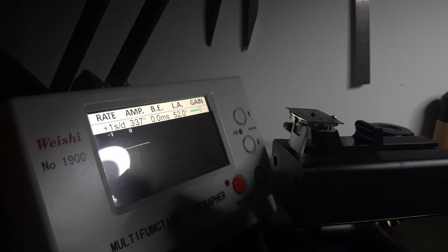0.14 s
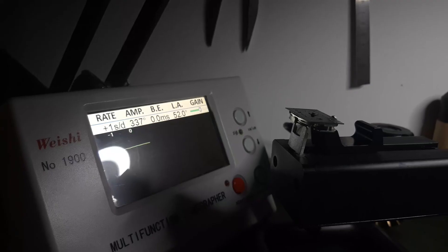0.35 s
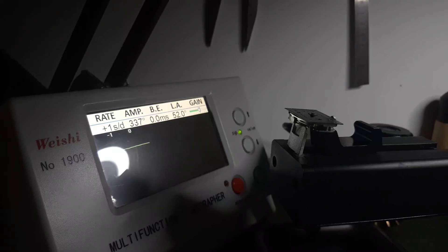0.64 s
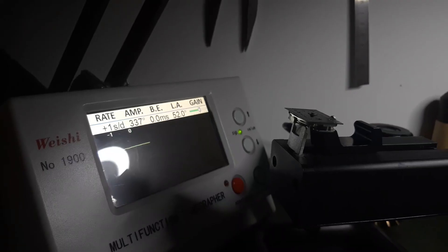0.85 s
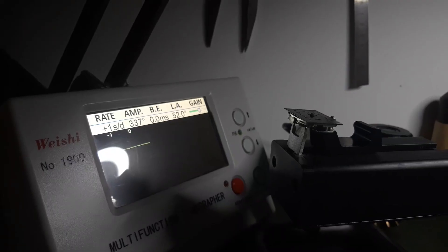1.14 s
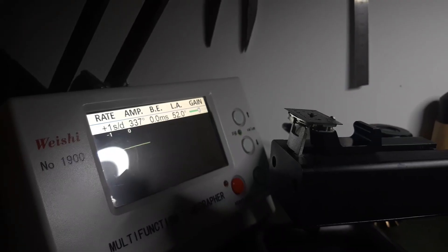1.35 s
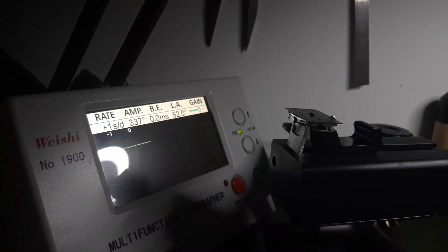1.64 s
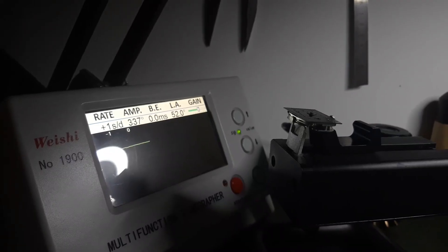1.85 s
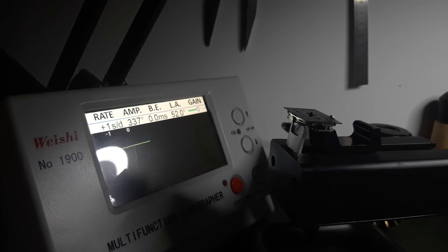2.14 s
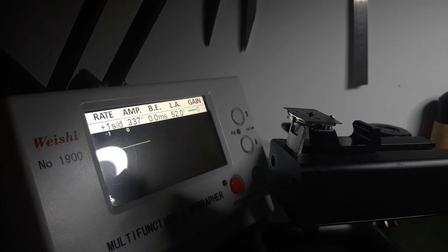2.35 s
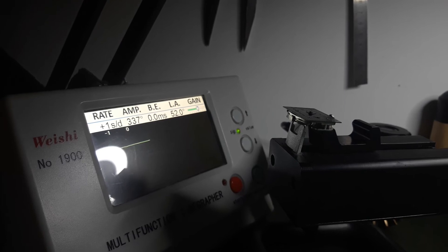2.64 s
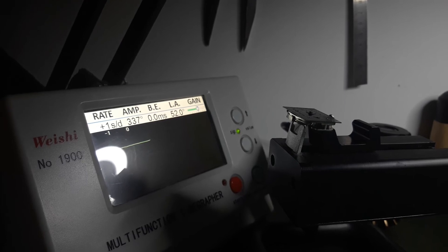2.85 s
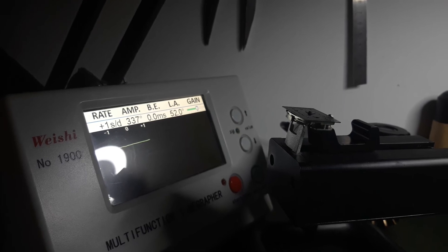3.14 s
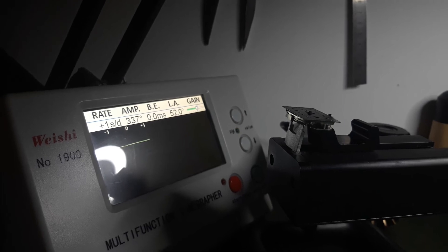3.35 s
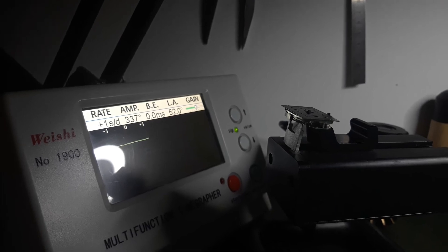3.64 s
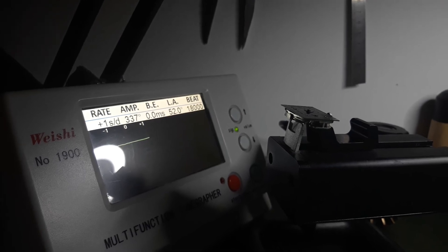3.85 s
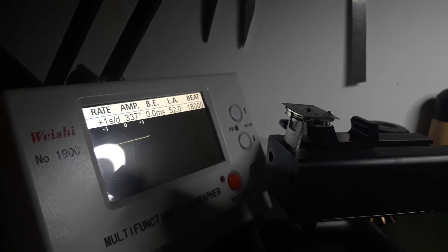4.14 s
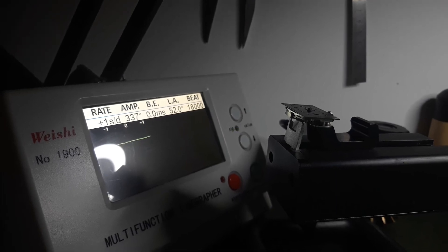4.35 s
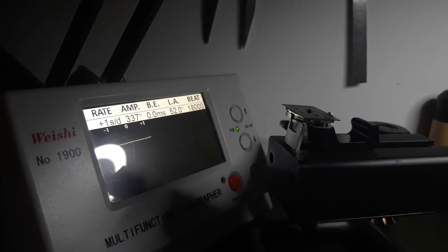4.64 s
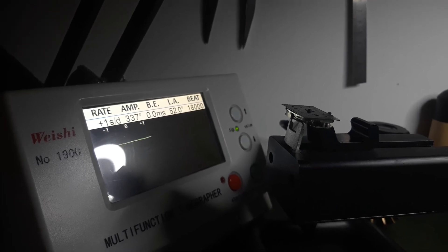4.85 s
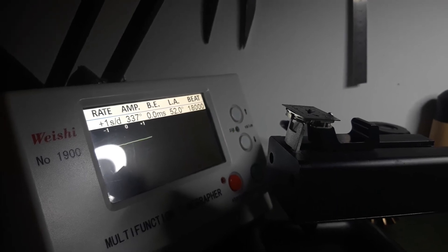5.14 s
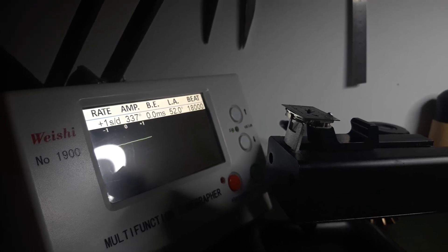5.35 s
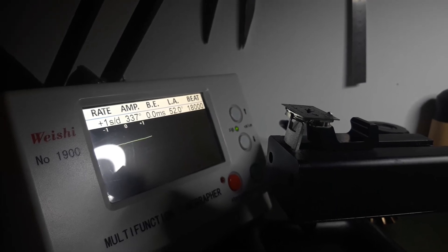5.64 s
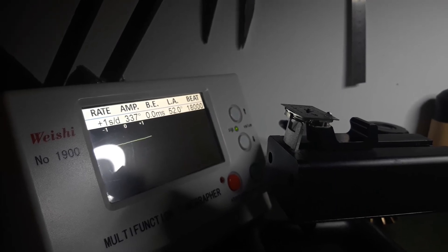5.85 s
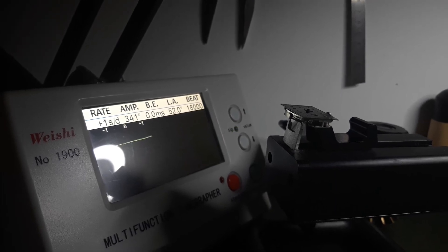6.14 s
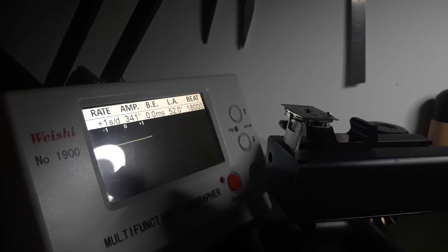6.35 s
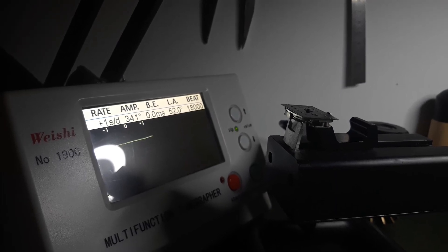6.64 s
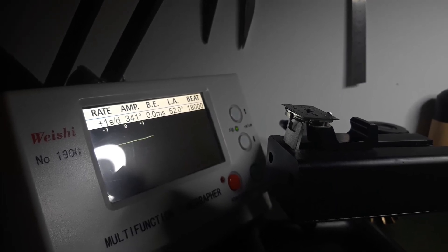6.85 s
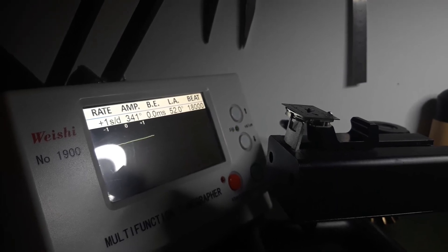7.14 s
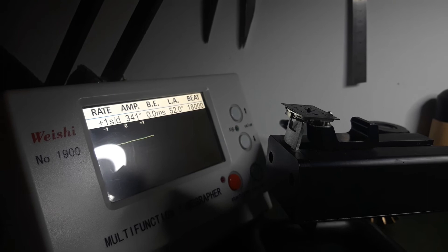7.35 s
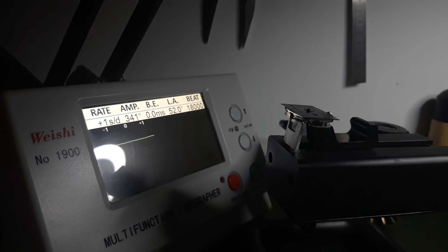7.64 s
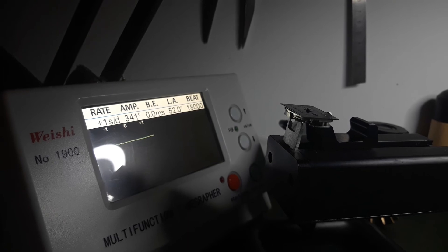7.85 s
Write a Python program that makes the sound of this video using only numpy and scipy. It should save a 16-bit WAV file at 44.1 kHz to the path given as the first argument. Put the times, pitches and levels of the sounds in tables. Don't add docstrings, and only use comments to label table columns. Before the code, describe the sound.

Steady bright electronic-sounding clicks, five per second, each just after a tiny watch tick, over faint distant mechanical rubbing, low rumble and soft hiss.

```python
import sys
import numpy as np
from scipy import signal
from scipy.fft import irfft
from scipy.io import wavfile
from scipy.ndimage import uniform_filter1d

SR = 44100
rng = np.random.default_rng(int(sys.argv[2]) if len(sys.argv) > 2 else 0)


def level_to_linear(level):
    exponent = np.asarray(level, float) / 20
    return 10 ** exponent


def master_out(mix):
    frames = np.transpose(np.atleast_2d(mix))
    ceiling = np.clip(frames, -1, 1)
    pcm = np.round(ceiling * 32767).astype(np.int16)
    wavfile.write(sys.argv[1], SR, pcm)


N = 352800

# f/Hz, level/dB, start/ms, push/ms, rise and fall/ms
DISC_MODES = [(2849, -20.5, 0.53, 8.43, 1.16), (4496, -25.5, 0.991, 5.1, 1.5),
              (2314.6, -27.5, 0.15, 8.27, 3.8), (2046.2, -25.5, 0.89, 3.87, 3.83),
              (2504.5, -30.5, 0.085, 8.9, 5.1), (3010, -27, 0.846, 5.54, 11), (5142, -43, 2.38, 5.7, 0.49),
              (4798, -39, 0.61, 4.5, 0.99), (3563, -39.5, .7, 5.5, 0.96), (3835, -41.5, 5.7, 5, 0.13),
              (3950, -34, .73, 1.9, 1.4), (2648, -33.5, 1.82, 3.8, 4.4)]
# f/Hz, level/dB, start/ms, push/ms, rise and fall/ms
CASE_MODES = [(570, -75.5, 2, 5.3, 0.85), (1390, -57, 1.6, 4.1, 1.9), (1209, -70, 2.455, 4, 1.1),
              (6014, -75, 0.26, 14, 1.6), (7430, -65, 0.74, 1.7, 0.62), (7750, -66.5, 5.5, 2.5, 0.96)]
# delay/ms, level/dB, smear/ms
WALL_ECHOES = [(6.5, -23, 0.77), (19.9, -13, 0.52), (28.3, -29.5, 4.3), (54.7, -31, 3.9), (76, -44.5, 17)]
# f/Hz, level 30 ms after the click/(dB per Hz), t60/s
ROOM_TAIL = [(1070, -116, 0.15), (1410, -99, 0.31), (1660, -113, 0.16), (1970, -82.5, 0.24),
             (2130, -85.5, 0.41), (2877, -75, 0.36), (3187, -84.5, .3), (3510, -94, 0.32), (3850, -85, 0.3),
             (4070, -89.5, 0.28), (4530, -78.5, 0.34), (4890, -88, 0.19), (5750, -105, 0.37),
             (8300, -123, 0.29)]
# f/Hz, level/(dB per Hz)
FLOOR_SPECTRUM = [(25, -116), (50, -107), (80, -99.5), (120, -98), (180, -103), (250, -110), (400, -113),
                  (800, -115.5), (1200, -118), (5800, -118), (7000, -120.5), (8500, -122.5), (11300, -123),
                  (15500, -121)]
# t into the cycle/s, level/dB, length/s
STROKES = [
    (0, -57, .045),
    (0.161, -62.5, .03),
    (0.479, -57.5, .037),
]
# f/Hz, width/Hz, level/dB
STROKE_RINGS = [
    [(2740, 270, 0), (3060, 340, 0.5), (3900, 500, -12.5), (4550, 450, -13), (4970, 380, -7.5)],
    [(2630, 400, -2), (2880, 260, 0), (4160, 260, -5.5), (5020, 400, -12.5), (6240, 1700, -10.5)],
    [(2540, 330, -1), (3180, 190, 1.5), (3740, 270, -9), (4300, 220, -6), (5900, 900, -18)],
]
CATCH_LATE = [0, -.035, 0.014, -0.0041, -.005, -.005, -0.045, .03]
HARD_TICKS = {14: 3, 18: 6, 24: 7, 38: 4}
# t/s, peak level/dB, low edge f/Hz, high edge f/Hz, decay/ms
KNOCKS = [
    (.79, -68, 70, 189, 7.2),
    (3.528, -66, 100, 450, 4),
    (4.047, -66, 500, 1350, 1.8),
    (4.047, -59, 55, 450, 2.4),
    (6.659, -65, 35, 110, 10),
    (7.441, -70, 100, 200, 25),
    (7.743, -57, 4000, 7800, 0.25),
]

FIRST_CLICK_S, BEAT_S, BEATS = .10062, .199992, 40
DISC_LO_HZ, DISC_HI_HZ = 1936, 5480
RATTLE_DB = -60
TOCK_DB = -0.1
FADE_DB_PER_S = -0.03
GATE_SHUT_DB, GATE_OPEN_DB, GATE_MEMORY_S = -71, -60.5, 0.06
CLICK_SHUT_DB, CLICK_OPEN_DB = 0.99, 2.5
TICK_LEAD_S = .019
TICK_DB, TICK_TOCK_DB, TICK_SCATTER_DB = -64.5, -4, 2
FIRST_STROKE_S, CYCLE_S = .555, 1.1495
STROKE_TAIL_S, STROKE_SCATTER_DB = 0.051, 2.6
THUD_SHARE = 0.54


def level(x, db):
    return x * level_to_linear(db) / np.sqrt(np.mean(x ** 2))


def band(x, lo_hz, hi_hz, order=2):
    return signal.sosfilt(signal.butter(order, [lo_hz, hi_hz], "band", fs=SR, output="sos"), x)


def add(track, s, sound):
    i = int(round(s * SR))
    part = sound[max(-i, 0):N - i]
    track[max(i, 0):max(i, 0) + len(part)] += part


def white(count):
    hz = np.arange(count // 2 + 1) * SR / count + 1
    turns = rng.random(len(hz))
    return np.log(hz), np.sqrt(count * SR / 2) * np.exp(2j * np.pi * turns)


def floor():
    pitch, noise = white(count=N)
    hz, db = np.transpose(FLOOR_SPECTRUM)
    noise = noise * level_to_linear(np.interp(pitch, np.log(hz), db))
    low = pitch < np.log(300)
    steps = np.repeat(rng.standard_normal(N // 4096 + 1), 4096)[:N]
    waver = uniform_filter1d(steps, 4096)
    rumble = irfft(noise * low, N) * level_to_linear(0.31 * waver)
    hiss = irfft(noise * ~low, N)
    return rumble + hiss


def driven(modes):
    ms, out = np.arange(SR // 25) * 1000 / SR, 0
    for hz, db, start, push, tau in modes:
        age = np.clip(ms - start, 0, None)
        build = 1 - np.exp(-np.minimum(age, push) / tau)
        release = np.exp(-np.clip(age - push, 0, None) / tau)
        out = out + level_to_linear(db) * build * release * np.sin(2 * np.pi * hz * age / 1000)
    return out


def workshop(click):
    s = np.arange(SR // 2) / SR
    walls = sum(level_to_linear(db) * np.exp(-((s * 1000 - ms) / smear) ** 2) for ms, db, smear in WALL_ECHOES)
    scatter = level_to_linear(-23.5) * walls * rng.standard_normal(len(s))
    echoes = signal.fftconvolve(click, scatter)[:len(s)]

    pitch, noise = white(count=len(s))
    hz, db, t60 = np.transpose(ROOM_TAIL)
    noise = noise * level_to_linear(np.interp(pitch, np.log(hz), db, left=-200, right=-200))
    tail = 0
    for row, t in zip(np.eye(len(hz)), t60):
        share = np.interp(pitch, np.log(hz), row)
        tail = tail + irfft(noise * share) * level_to_linear(-60 * (s - .03) / t)
    onset = np.clip((s - .004) / 0.0022, 0, 1) ** 2
    return echoes + tail * onset


def sounder(background):
    edges = signal.ellip(5, .5, 45, [DISC_LO_HZ, DISC_HI_HZ], "band", fs=SR, output="sos")
    click = signal.sosfilt(edges, driven(DISC_MODES)) + band(driven(CASE_MODES), 350, 15000)
    ms = np.arange(len(click)) * 1000 / SR
    buzz = np.clip(ms - .7, 0, 1) * np.exp(-np.clip(ms - 8, 0, None) / 4.2)
    rattle = buzz * level(rng.standard_normal(len(ms)), RATTLE_DB)
    click = click + band(rattle, 4400, 7300, order=4)
    echo = workshop(click)

    out = np.zeros(N)
    add(out, FIRST_CLICK_S - BEAT_S, echo)
    memory = int(GATE_MEMORY_S * SR)
    for beat in range(BEATS):
        s = FIRST_CLICK_S + beat * BEAT_S
        before = background[int(s * SR) - memory:int(s * SR)]
        before_db = 10 * np.log10(np.mean(before ** 2) + 1e-12)
        opened_db = np.interp(before_db, [GATE_SHUT_DB, GATE_OPEN_DB], [CLICK_SHUT_DB, CLICK_OPEN_DB])
        fade_db = FADE_DB_PER_S * (s - N / SR / 2)
        add(out, s, level_to_linear(opened_db + TOCK_DB * (beat % 2) + fade_db) * click)
        add(out, s, echo)
    return out


def rubbing():
    t, out = np.arange(SR // 3) / SR, np.zeros(N)
    for cycle, late in enumerate(CATCH_LATE):
        start = FIRST_STROKE_S + (cycle - 1) * CYCLE_S
        for (s, db, length), rings, loose in zip(STROKES, STROKE_RINGS, [0, late, 0]):
            noise = rng.standard_normal((len(rings), len(t)))
            swell = np.clip(t / 0.013, 0, 1) * np.exp(-np.clip(t - length, 0, None) / STROKE_TAIL_S)
            voice = sum(level(band(n, hz - w / 2, hz + w / 2), d) for (hz, w, d), n in zip(rings, noise))
            stroke_db = db + STROKE_SCATTER_DB * noise[0, 0]
            add(out, start + s + loose, swell * level(voice, stroke_db))
    return out


def escapement():
    ms, out = np.arange(4096) * 1000 / SR, np.zeros(N)
    taps = np.exp(-ms / 1.1) + .6 * (ms > 2.5) * np.exp(-np.abs(ms - 2.5) / 1.4)
    drop = np.exp(-((ms - 23) / 2.9) ** 2)
    ring = np.exp(-ms / 35)
    for beat, noise in enumerate(rng.standard_normal((BEATS, 4, len(ms)))):
        s = FIRST_CLICK_S + beat * BEAT_S - TICK_LEAD_S
        db = TICK_DB + TICK_TOCK_DB * (beat % 2)
        db = db + TICK_SCATTER_DB * noise[3, 0] + HARD_TICKS.get(beat, 0)
        add(out, s, level_to_linear(db + 4.5) * band(taps * noise[0], 11000, 15000, order=4))
        add(out, s, level_to_linear(-67) * band(drop * noise[1], 11400, 14500, order=4))
        add(out, s, level_to_linear(-70.5) * band(ring * noise[2], 11600, 14000, order=4))
    return out


def hand():
    ms, out = np.arange(SR // 8) * 1000 / SR, np.zeros(N)
    noises = rng.standard_normal((len(KNOCKS), len(ms)))
    for (s, db, lo_hz, hi_hz, decay), noise in zip(KNOCKS, noises):
        thud = THUD_SHARE * np.sin(2 * np.pi * np.sqrt(lo_hz * hi_hz) * ms / 1000)
        body = thud + (1 - THUD_SHARE) * level(band(noise, lo_hz, hi_hz), 0)
        burst = level(body, db) * ms / decay * np.exp(1 - ms / decay)
        add(out, s, band(burst, lo_hz / 2, hi_hz))
    return out


def scene():
    rub = rubbing()
    mix = sounder(rub) + escapement() + rub + hand() + floor()
    return mix[None]


def top_cut(x):
    return signal.sosfilt(signal.butter(12, 15800, fs=SR, output="sos"), x)


def record(dry):
    cut = signal.sosfilt(signal.ellip(8, .2, 70, 15650, fs=SR, output="sos"), dry)
    return top_cut(cut)


dry = scene()
out = record(dry)
master_out(out)
```